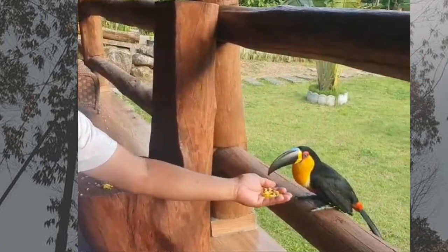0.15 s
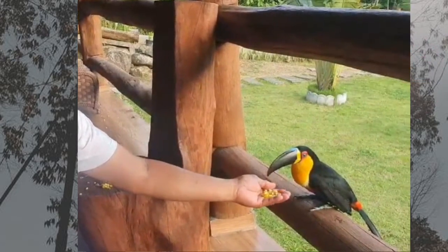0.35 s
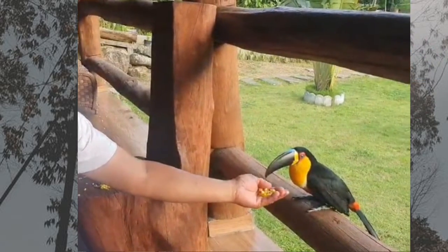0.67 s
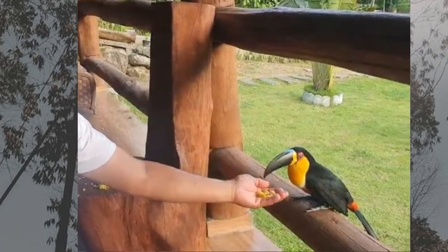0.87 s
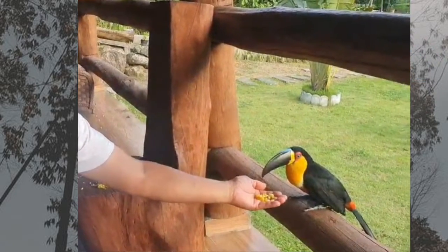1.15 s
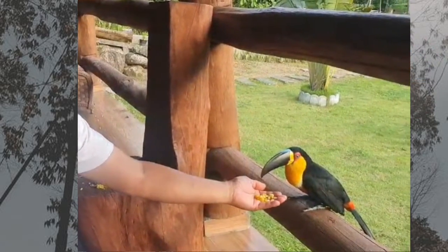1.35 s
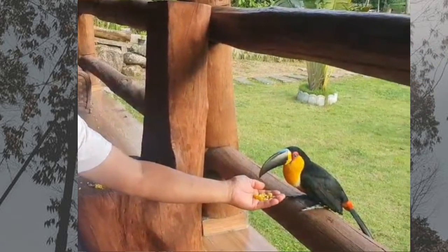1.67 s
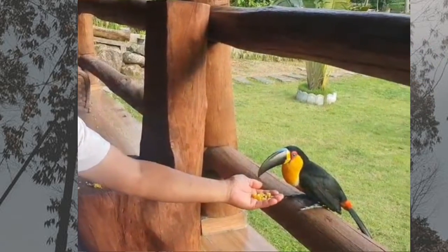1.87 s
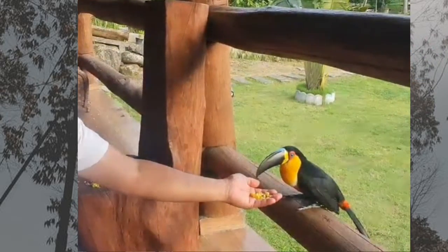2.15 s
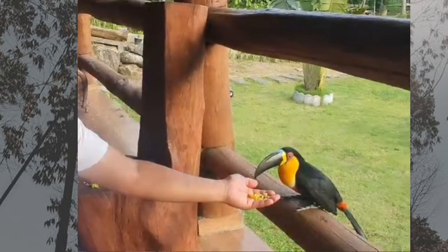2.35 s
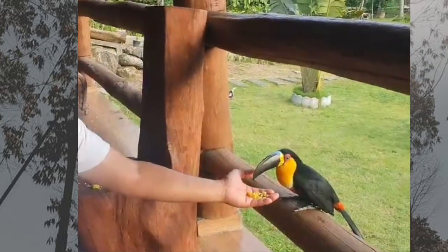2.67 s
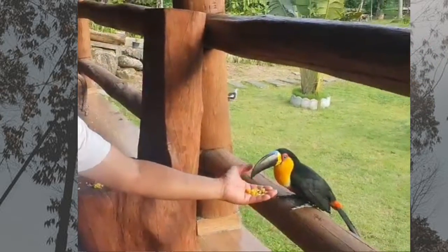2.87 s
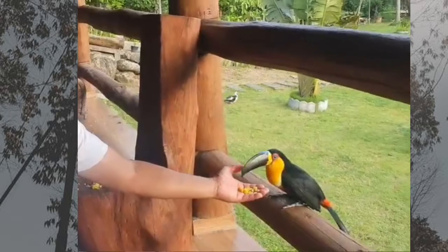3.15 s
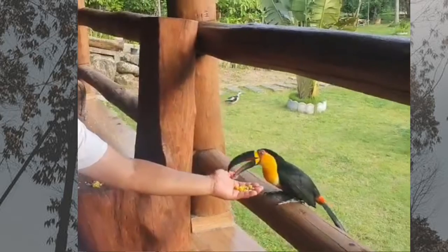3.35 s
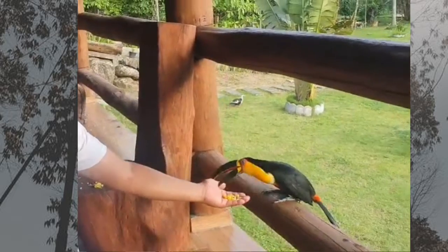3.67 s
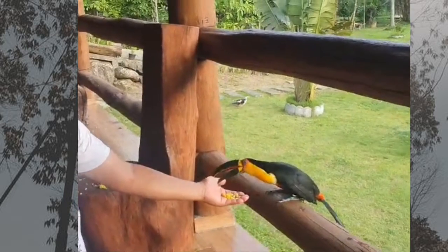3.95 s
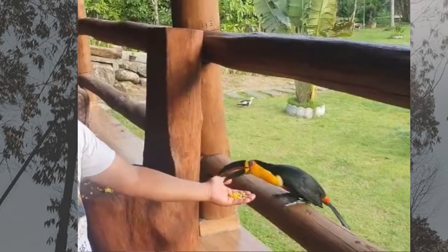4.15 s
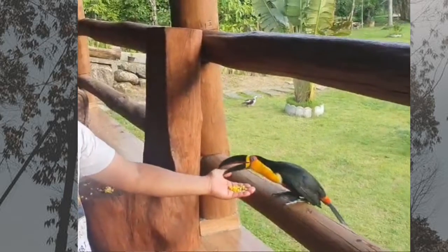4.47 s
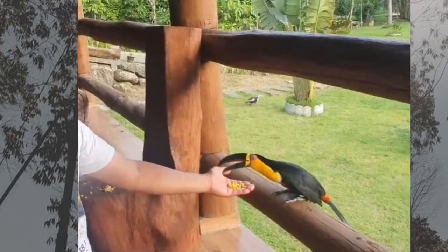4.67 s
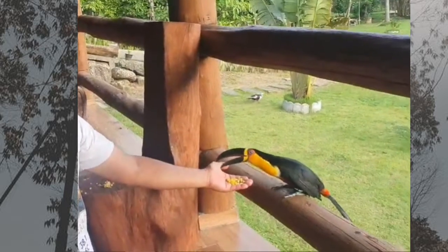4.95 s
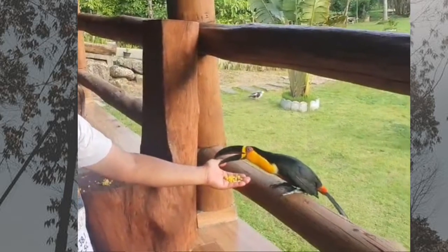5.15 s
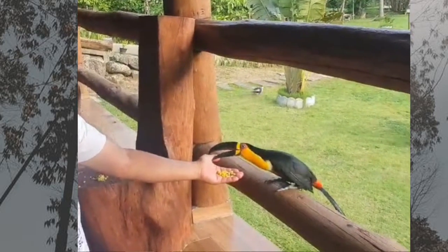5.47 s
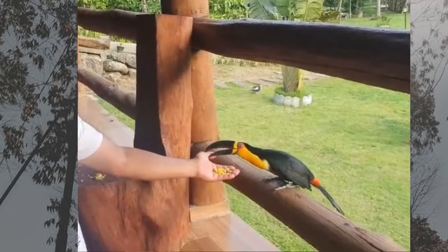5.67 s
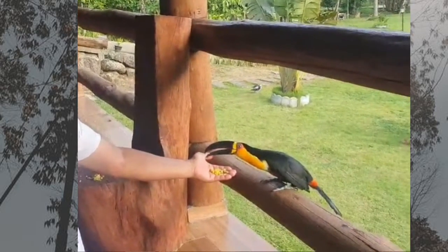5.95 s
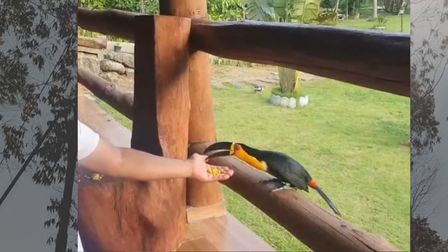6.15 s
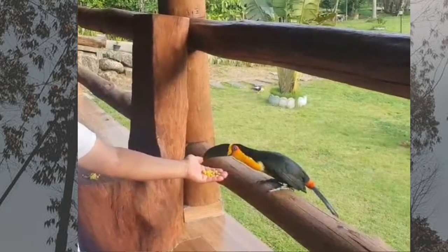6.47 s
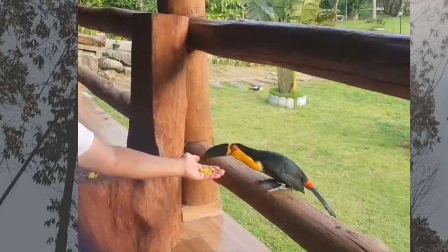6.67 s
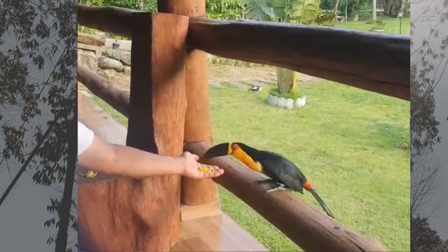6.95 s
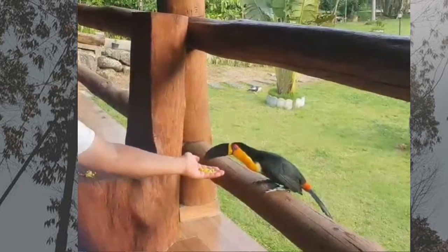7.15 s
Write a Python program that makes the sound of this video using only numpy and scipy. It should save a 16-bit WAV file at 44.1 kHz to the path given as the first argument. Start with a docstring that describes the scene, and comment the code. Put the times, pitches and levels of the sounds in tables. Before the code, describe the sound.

Outdoors beside a wooden veranda, a steady airy hiss carries high, thin birdsong from around the garden, with two loud pure whistles standing out. In front, a toucan croaks five times, woody and nasal, like a short ratchet slowing down, with close hard reflections and a faint garden echo. The small microphone sounds slightly boxy; tiny clicks appear in the last second or so.

```python
"""Five hoarse toucan croaks, each a slowing rattle of eight or nine pulses, over other birds in a garden.
Every croak pulse is a very fast downward sweep through throat and bill resonances, widest in mid-croak;
veranda surfaces and the garden return it. The other birds are near-pure tones that arch, plunge, sag or scoop.
Filtered noise makes an even outdoor hiss, faint hums and small dry contacts.
The microphone port colours the sum and the recorder's gain ducks under the loudest sounds."""
import sys
import numpy as np
from scipy import signal
from scipy.fft import rfft, irfft
from scipy.io import wavfile
from scipy.ndimage import uniform_filter1d

SR = 44100
rng = np.random.default_rng(int(sys.argv[2]) if len(sys.argv) > 2 else 0)


def inscribe(sig):
    """Save sig as 16-bit PCM at rate SR to the path in sys.argv[1].

    A 1-D sig is mono; a 2-D sig holds one channel per row.
    Samples are clipped to [-1, 1] before scaling.
    """
    pcm = np.round(np.clip(np.atleast_2d(sig).T, -1, 1) * 32767)
    wavfile.write(sys.argv[1], SR, pcm.astype(np.int16))


N = 322371
TIME_S = np.arange(N) / SR


def from_db(db):
    """Amplitude ratio of a level in dB."""
    return 10 ** (np.asarray(db) / 20)


def rms_one(x):
    """Scale to RMS 1."""
    return x / np.sqrt(np.mean(x ** 2) + 1e-20)


def add(out, start_s, sound):
    """Mix a sound in from start_s on, trimmed to the output."""
    at = int(round(start_s * SR))
    part = sound[max(-at, 0):max(N - at, 0)]
    first = max(at, 0)
    out[first:first + len(part)] += part


def resonate(x, hz, width_hz):
    """Two-pole resonance with gain near 1 at its peak."""
    r = np.exp(-np.pi * width_hz / SR)
    numerator = np.array([1, 0, -1]) * (1 - r * r) / 2
    denominator = [1, -2 * r * np.cos(2 * np.pi * hz / SR), r * r]
    return signal.lfilter(numerator, denominator, x)


def lowpass(x, order, hz):
    """Butterworth treble cut; the tiny offset avoids denormals."""
    return signal.sosfilt(signal.butter(order, hz, fs=SR, output="sos"), x + 1e-18)


def wander(t, knots_per_s):
    """Random normal values joined by straight lines, spread near 1."""
    knots = rng.standard_normal(size=512)
    return np.interp(t * knots_per_s % len(knots), np.arange(len(knots)), knots)


def echoes(t60_s, first_s, per_s):
    """Scattered returns from walls and trees, growing denser as they die; energy 1."""
    t = np.arange(SR) / SR
    strengths = rng.standard_normal(SR)
    arrives = rng.random(SR) < per_s * (1 + t / first_s) / SR
    tail = strengths * arrives * (t > first_s) * from_db(-60 * t / t60_s)
    return tail / np.sqrt(np.sum(tail ** 2) + 1e-20)


def outdoors():
    """Even hiss of the surroundings (coloured noise) over faint wavering hums (narrow-band noise)."""
    # hiss colour: (frequency [Hz], relative level [dB])
    hiss_colour = [(25, -38.5), (60, -27.5), (120, -20), (195, -21), (260, -13.5), (460, -16), (750, -1.5),
                   (1250, -9), (2450, -9), (3600, 6), (4500, -1), (6300, -11), (7900, -13), (8700, -22.5),
                   (11800, -34), (12500, -49)]
    # hiss level: (time [s], level [dB])
    hiss_level = [(0, -34), (1.8, -32), (3.2, -32.5), (4.6, -32), (5.35, -33), (5.6, -31), (7.3, -33)]
    # hums: (start [s], end [s], frequency [Hz], level [dB])
    hum_rows = [(.70, 1.30, 88, -66), (0, 7.31, 243, -69), (1.65, 2.35, 402, -63)]
    hz, db = np.transpose(hiss_colour)
    bin_hz = np.fft.rfftfreq(N, 1 / SR)
    colour = from_db(np.interp(np.log(bin_hz + 1), np.log(hz), db))
    hiss = rms_one(irfft(rfft(rng.standard_normal(N)) * colour, N))
    hiss_db = np.interp(TIME_S, *np.transpose(hiss_level)) + 0.29 * wander(TIME_S, 26)
    out = hiss * from_db(hiss_db)
    for start_s, end_s, hum_hz, hum_db in hum_rows:
        gate = np.clip(np.minimum(TIME_S - start_s, end_s - TIME_S) / .04, 0, 1)
        hum = rms_one(resonate(rng.standard_normal(N), hum_hz, width_hz=3.3))
        out += from_db(hum_db) * gate * hum
    return out


def ticks(sharpness, snap_db):
    """Light ticks and soft knocks: one noise burst through a broad snap and a narrow ring."""
    # contacts: (time [s], level [dB], ring frequency [Hz], decay to 1/e [s])
    contact_rows = [(2.128, -42, 330, 0.024), (5.926, -26.5, 7200, 0.003), (6.594, -26.5, 4900, 0.0042),
                    (6.912, -29, 4570, 0.011), (6.912, -26.5, 1095, 0.012), (7.157, -25.5, 4840, 0.0065)]
    out, t = np.zeros(N), np.arange(SR // 5) / SR
    for start_s, db, hz, decay_s in contact_rows:
        burst = rng.standard_normal(len(t))
        snap = from_db(snap_db) * rms_one(resonate(burst, 4400, 3500))
        ring = rms_one(resonate(burst, hz, hz / sharpness))
        add(out, start_s, from_db(db) * np.exp(-t / decay_s) * (snap + ring))
    return lowpass(out, 4, 8000)


def note(t, hz, waver, fullness, octave_db):
    """Near-pure tone with wavering pitch; swells and fades with unsteady loudness."""
    phase = 2 * np.pi * np.cumsum(hz * (1 + waver * wander(t, 599.0))) / SR
    swell = np.abs(np.sin(np.pi * t / t[-1])) ** fullness   # lower exponent: fuller note
    unsteady = from_db(3.7 * wander(t, 125.6))
    return swell * unsteady * (np.sin(phase) + from_db(octave_db) * np.sin(2 * phase))


def garden_birds(notes, glide, waver, fullness, t60_s, octave_db=-48.0):
    """Gliding notes, each with its own echoes; those begun before break_s are faded out together by then."""
    break_s, fade_s = 5.53, 0.023
    before, after = np.zeros((2, N))
    for start_s, length_s, hz, db, echo_db, *shape in notes:
        path = from_db(echo_db) * echoes(t60_s, first_s=.005, per_s=700)
        path[0] = 1   # direct sound
        path /= np.sqrt(np.sum(path ** 2))
        t = np.arange(int(length_s * SR)) / SR
        pitch_hz = hz * 2 ** glide(t, length_s, *shape)
        call = from_db(db) * note(t, pitch_hz, waver, fullness, octave_db)
        add(before if start_s < break_s else after, start_s, signal.fftconvolve(call, path))
    return before * np.clip((break_s - TIME_S) / fade_s, 0, 1) + after


def arch(t, length_s):
    """Whistle glide in octaves: up to a top, down again, drooping at the very end."""
    top_share, bend_octaves_per_s2, droop_octaves = .44, 15, 0.1044
    bend = -bend_octaves_per_s2 * (t - top_share * length_s) ** 2
    return bend - droop_octaves * (t / length_s) ** 4


def plunge(t, length_s):
    """"Tew" glide in octaves: a steep drop at one rate."""
    octaves_per_s = 10.2
    return -octaves_per_s * t


def sag(t, length_s):
    """Slur glide in octaves: a slow sinking at one rate."""
    octaves_per_s = 2.8
    return -octaves_per_s * t


def scoop(t, length_s, depth_octaves):
    """Chip glide in octaves: starts low and settles on the held pitch."""
    settle_s = .022
    return -depth_octaves * np.exp(-t / settle_s)


def whistles():
    """Arched whistles with a faint octave."""
    # (start [s], length [s], top pitch [Hz], level [dB], echo re direct [dB])
    whistle_rows = [ (-.05, 0.077, 3420, -24.5, -1), (.812, 0.119, 3473, -19, -5.5),
                    (1.205, 0.19, 3639, -15, -0.5), (1.39, 0.11, 3454, -23.5, 0),
                    (2.388, 0.21, 3685, -4, -1.5), (5.32, 0.24, 3540, -4, 2),
                    (6.008, .13, 3468, -12.5, -4.5)]
    return garden_birds(whistle_rows, arch, waver=0.0035, fullness=1.11, t60_s=0.51, octave_db=-35.5)


def tews():
    """Sharp plunging calls."""
    # (start [s], length [s], first pitch [Hz], level [dB], echo re direct [dB])
    tew_rows = [ (.412, .032, 6300, -25.5, 3), (.558, 0.069, 2884, -25.5, -4),
                (1.532, 0.062, 3070, -33, -2), (1.795, 0.05, 2960, -30, -10),
                (2.105, 0.064, 2840, -30.5, 2), (3.275, 0.05, 4650, -15.5, 3.5),
                (3.44, 0.064, 2750, -34, 4), (4.285, 0.056, 2370, -34.5, 5), (4.672, 0.028, 6100, -23, 6),
                (4.71, 0.063, 4866, -14, -4), (5.302, 0.066, 2970, -25, 0), (6.137, 0.042, 3000, -24.5, -4),
                (7.227, .04, 2930, -28, -2), (7.268, .035, 2700, -33, -6)]
    return garden_birds(tew_rows, plunge, waver=0.024, fullness=0.29, t60_s=0.32)


def slurs():
    """Gently sagging calls."""
    # (start [s], length [s], first pitch [Hz], level [dB], echo re direct [dB])
    slur_rows = [ (1.795, 0.049, 3162, -14.5, 4), (1.845, 0.049, 3124, -15.5, 7),
                 (2.19, 0.12, 3750, -22.5, -2.5), (2.355, 0.069, 2204, -36, -8),
                 (2.995, .085, 2558, -23, 0), (3.39, 0.11, 3790, -16.5, 2), (3.49, .11, 3410, -17.5, 4.5),
                 (4.303, 0.11, 3528, -14, -2.5), (4.39, 0.084, 2975, -28.5, 5),
                 (4.808, 0.044, 4104, -17.5, -1.5)]
    return garden_birds(slur_rows, sag, waver=.034, fullness=0.4, t60_s=0.48)


def chips():
    """Chips that scoop up to a held pitch, all with the same echo level."""
    # (start [s], length [s], held pitch [Hz], level [dB], scoop depth [octaves])
    chip_rows = [ (3.185, 0.13, 5950, -29.5, 0.029), (3.256, 0.18, 3120, -22, 0.033),
                 (3.705, 0.05, 4550, -17.5, 0.45), (3.866, 0.069, 4450, -19.5, 0.33),
                 (3.981, 0.075, 3030, -23.5, .1), (4.407, 0.061, 4620, -31, .03),
                 (4.435, 0.067, 5880, -24.5, 0.107), (4.598, 0.048, 4570, -15, .32),
                 (5.061, 0.053, 4900, -25, 0.17), (5.08, 0.073, 5700, -25.5, 0.058),
                 (5.983, 0.041, 4850, -31, 0.022)]
    echo_db = 2
    notes = [(start_s, length_s, hz, db, echo_db, depth) for start_s, length_s, hz, db, depth in chip_rows]
    return garden_birds(notes, scoop, waver=0.022, fullness=0.22, t60_s=0.5)


def croak_pulse(effort, flash_s, flash_db, rasp_db, jitter_octaves):
    """The membrane flicks open and its pitch tumbles; more effort starts it higher and carries it lower."""
    # throat and bill resonances: (frequency [Hz], width [Hz], level [dB])
    throat_modes = [(740, 117, -10.5), (1561, 110, 1), (2577, 180, -0.5), (2800, 134, 2), (3340, 182, 4.5),
                    (3740, 91, 0), (4420, 120, -3.5)]
    centre_hz = 1620
    octave_fall_s, fade_s = .0042, .0055   # both before scaling by effort
    t = np.arange(-SR // 50, SR // 50) / SR + .0012
    reach = max(effort, .1)
    octave_s = octave_fall_s / np.sqrt(reach)
    octaves = -t / octave_s + jitter_octaves * wander(t - t[0], 886)
    pitch_hz = centre_hz * 2 ** np.clip(octaves, -1.35, 1.35)
    phase = 2 * np.pi * (np.cumsum(pitch_hz) / SR + rng.random())
    onset = np.clip((t + reach * octave_s) / 0.00038, 0, 1)
    swell = onset * np.exp(-(t / (fade_s * (0.24 + reach))) ** 2)
    rasp = from_db(rasp_db) * rng.standard_normal(len(t))
    # at the height of the swing the vibration distorts, and the octave flashes out
    flash = from_db(flash_db) * np.exp(-((t + .0005) / flash_s) ** 2)
    source = swell * (np.sin(phase) + rasp) + flash * np.sin(2 * phase)
    voiced = []
    for k, (hz, width_hz, db) in enumerate(throat_modes):
        voiced.append((-1) ** k * from_db(db) * resonate(source, hz, width_hz))
    return sum(voiced) / np.abs(voiced[1]).max()   # second resonance peaks at 1


def croak_pulses():
    """Each croak is a slowing run of pulses that swell, widen and narrow again."""
    # croaks: (start [s], first pulse gap [s], pulses [count], strength [dB],
    #          top effort [octaves swept either side of centre])
    croak_rows = [(.2003, .0181, 8, -1.5, 1.3), (2.5521, .0186, 8, -1, 1.25), (3.7171, .0184, 8, -3, 1.25),
                  (4.8209, .0185, 8, -2, 1.35), (6.6895, .0174, 9, 1, .8)]
    slowing = 1.07   # each gap over the one before
    croak_db, onset_db, attack_s, hold_s, release_db_per_s = -17, -8.5, 0.018, .16, 339
    effort_top_s, effort_width_s, effort_rest = .094, 0.06214, 0.3626
    spread_db_per_octave = -1.5   # a wide sweep spreads the pulse thin
    flash_full_db, flash_follows = 3.5, 0.66   # octave flash level; dB per dB of envelope
    uneven_db, uneven_effort = 1.23, 0.0999   # pulse to pulse: dB, share of effort
    out = np.zeros(N)
    for start_s, first_gap_s, pulses, strength_db, top_effort in croak_rows:
        for k in range(int(round(pulses))):
            t = first_gap_s * (slowing ** k - 1) / (slowing - 1)
            loud, wide, bright = rng.standard_normal(size=3)
            push = np.exp(-((t - effort_top_s) / effort_width_s) ** 2)
            arched = effort_rest + (1 - effort_rest) * push
            effort = top_effort * arched * (1 + uneven_effort * wide)
            envelope_db = onset_db * np.exp(-t / attack_s) - release_db_per_s * max(t - hold_s, 0)
            flash_db = flash_full_db + flash_follows * envelope_db + uneven_db * bright
            pulse = croak_pulse(effort, flash_s=0.002, flash_db=flash_db, rasp_db=-15.5, jitter_octaves=0.074)
            level_db = croak_db + strength_db + envelope_db
            level_db += spread_db_per_octave * effort + uneven_db * loud
            add(out, start_s + t - len(pulse) / 2 / SR, from_db(level_db) * pulse)
    return out


def toucan():
    """Croaks with veranda reflections and a short, thinner tail; the bill lets little treble out."""
    # hard veranda surfaces: (delay [s], level [dB])
    reflections = [(.0046, -14), (.0125, -18)]
    direct = croak_pulses()
    tail = signal.fftconvolve(direct, echoes(t60_s=0.25, first_s=0.006, per_s=990))[:N]
    thin_tail = tail - .4 * resonate(tail, 1650, 900)
    out = direct + from_db(0.5) * thin_tail
    for delay_s, db in reflections:
        add(out, delay_s, from_db(db) * direct)
    return lowpass(out, 2, 5600)


def scene():
    """The toucan in front, the other birds further out."""
    croaks = toucan()
    garden_path = echoes(t60_s=1.0, first_s=0.11, per_s=700)
    far_echo = from_db(-16) * signal.fftconvolve(croaks, garden_path)[:N]   # croaks return from the garden
    garden = lowpass(whistles() + tews() + slurs() + chips(), 8, 8500)   # distance dulls them
    return (croaks + far_echo + garden + ticks(sharpness=32, snap_db=-13) + outdoors())[None]


def gain_control(x, threshold_db, share, release_db_per_s):
    """Loud sounds pull the gain down at once; it creeps back at a fixed dB rate."""
    power = np.abs(uniform_filter1d(x ** 2, size=3072))
    level_db = 10 * np.log10(power + 1e-12)
    cut_db = share * np.maximum(level_db - threshold_db, 0)
    recovery_db = release_db_per_s * TIME_S
    held_db = np.maximum.accumulate(cut_db + recovery_db, axis=-1) - recovery_db
    return x * from_db(-held_db)


def record(dry):
    """The microphone port colours the sound, the gain ducks, the top is cut."""
    # port resonances: (frequency [Hz], width [Hz], boost [dB])
    port_modes = [(1698, 139, 16.5), (7440, 570, 8.5)]
    cutoff_hz = 15400
    coloured = dry + sum((from_db(db) - 1) * resonate(dry, hz, width_hz) for hz, width_hz, db in port_modes)
    levelled = gain_control(coloured, threshold_db=-11.5, share=1.0, release_db_per_s=2.0)
    return signal.sosfilt(signal.ellip(10, .1, 70, cutoff_hz, fs=SR, output="sos"), levelled)


dry = scene()
out = record(dry)
inscribe(out)
```